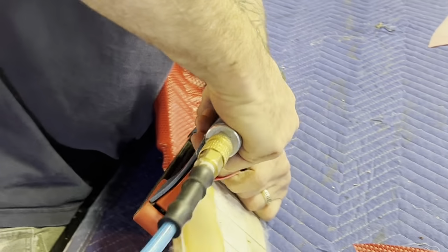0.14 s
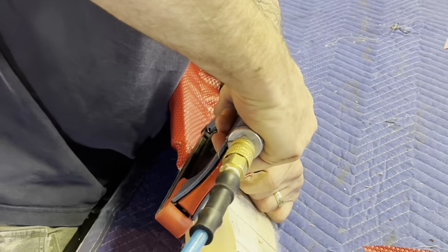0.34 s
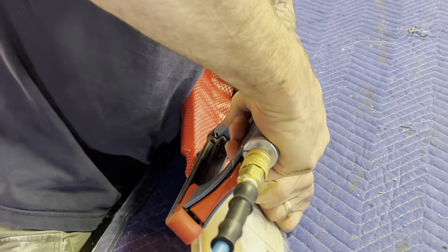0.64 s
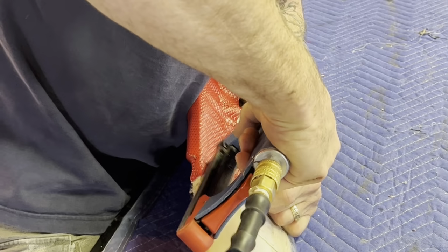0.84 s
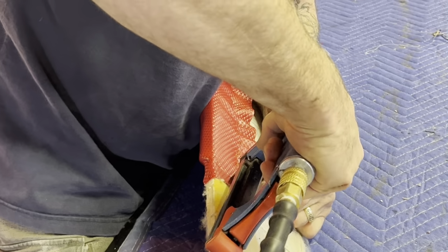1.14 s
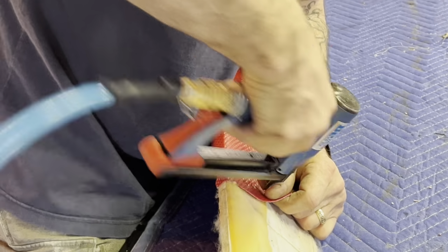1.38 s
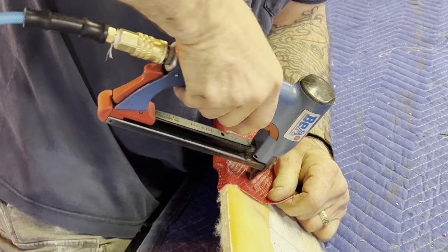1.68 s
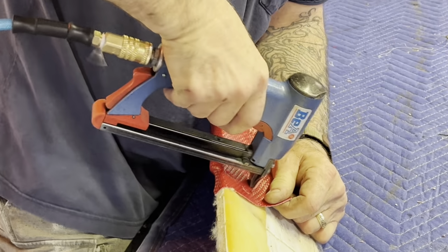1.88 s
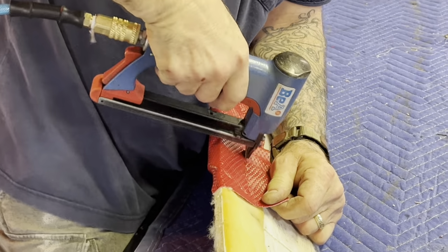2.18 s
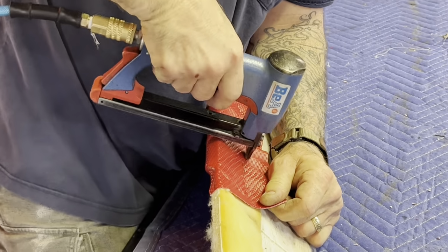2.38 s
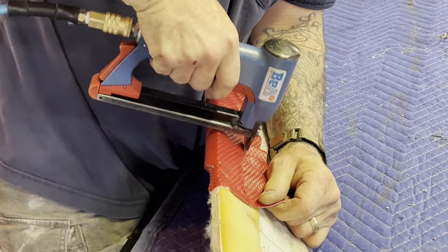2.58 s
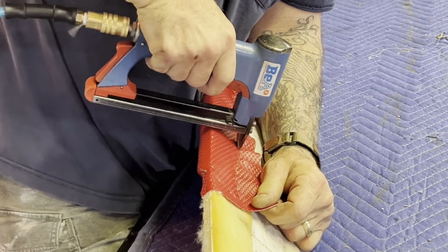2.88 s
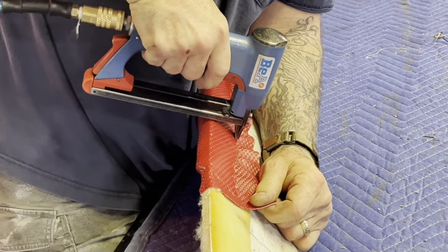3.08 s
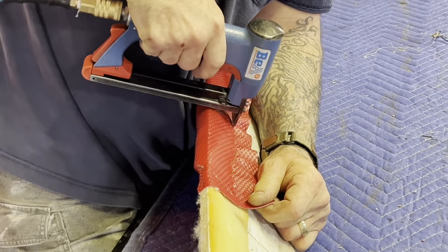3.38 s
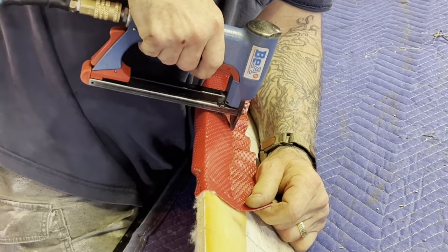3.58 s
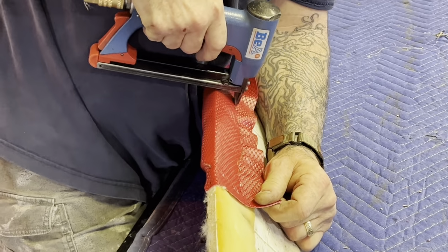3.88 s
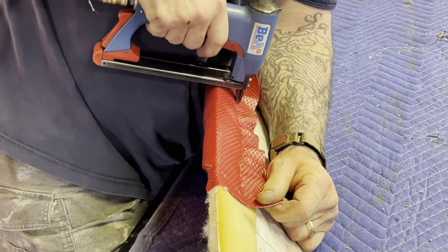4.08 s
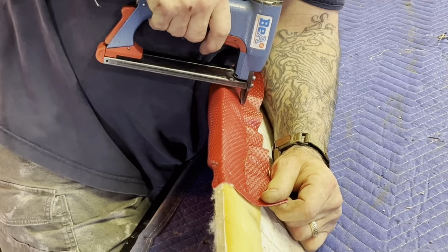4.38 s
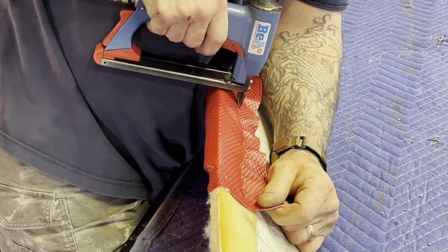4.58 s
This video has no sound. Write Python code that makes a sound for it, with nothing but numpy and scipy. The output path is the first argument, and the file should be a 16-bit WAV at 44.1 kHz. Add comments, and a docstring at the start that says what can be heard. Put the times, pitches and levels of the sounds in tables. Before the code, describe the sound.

Close, sharp cracks of a pneumatic staple gun hitting a wooden frame, eight times at an uneven pace, with clicking air puffs between.

```python
"""Air stapler in a workshop

Eight staples go through vinyl into a wooden frame, close by. At each pull of the trigger, air rushes in,
the blade meets the staple, the piston slams home and the frame rings in its modes. At each release, the
valve clicks, the exhaust puffs and the piston returns. The tool is held end-on for two staples, where
its inlet and nose are louder, then swung side-on. The room reverberates over a low rumble."""
import sys
import numpy as np
from scipy import signal
from scipy.fft import rfft, irfft, next_fast_len
from scipy.io import wavfile
from scipy.ndimage import uniform_filter1d

SR = 44100
rng = np.random.default_rng(int(sys.argv[2]) if len(sys.argv) > 2 else 0)


def to_wav(sig):
    """Store sig (one row per channel, or 1-D mono) as 16-bit WAV at the path in sys.argv[1].

    Samples outside -1..1 are clipped; the rate is SR.
    """
    pcm = np.clip(np.atleast_2d(sig), -1, 1) * 32767
    pcm = np.round(pcm).astype(np.int16)
    wavfile.write(sys.argv[1], SR, pcm.T)  # frames by channels


N = 209014
EVENT_S = np.arange(SR // 2) / SR  # time within one event

# The piston slams home: time_s, blow_db, tilt_db_per_octave, leak_db
STAPLE_SHOTS = [(0.7097, -15, -0.5, -40), (1.1246, -8, 0.5, -49.5), (1.8803, -9, 1.5, -45),
                (2.4383, -9, 0.4, -47), (2.838, -9, -1.34, -44.5), (3.1902, -9, -0.7, -45.5),
                (3.5539, -9, -0.5, -44.5), (4.551, -7.5, -1.5, -47.5)]
# Spectra of the inrushing air, the blade's contact and the piston's blow: frequency_hz, level_db
INLET_SPECTRUM = [(100, -30.5), (700, -16.5), (1700, -4), (2500, -1.5), (4000, -4), (5500, -1), (7500, 1.5),
                  (9000, -9), (13000, -11.5), (15500, -3.5)]
BLADE_SPECTRUM = [(80, -14.5), (300, -4), (700, -4), (1500, -1), (2200, -4.5), (3500, -14), (7000, -23.5),
                  (15500, -16.5)]
BLOW_SPECTRUM = [(60, -16.5), (220, 1.5), (450, -4.5), (700, -5.5), (1100, 0.5), (2800, -3), (4500, -6),
                 (7000, -7.5), (8500, -16), (12000, -11.5), (15500, -25)]
# Modes of the steel nose: pitch_hz, bandwidth_hz, level_db
NOSE_MODES = [(1130, 990, -4), (2650, 630, 0)]
# Pairs given to posed() are (side-on, end-on).
INLET_LEAD_S, INLET_DB, CLANG_DB = (0.016, 0.0098), (-21.5, -10), (-33, -7)
REBOUND_DELAY_S, REBOUND_DB = (0.0036, 0.0061), (-15.5, -8)
def piston_stroke(s, blow_db, tilt_db):
    """Impact: air drives the piston, the blade shears off a staple, steel collides and the tool rebounds."""
    rebound_s, rebound_db = s + posed(REBOUND_DELAY_S, s), posed(REBOUND_DB, s)
    inlet_s = s - posed(INLET_LEAD_S, s)
    steel = colour(BLOW_SPECTRUM)
    inlet = bursts(inlet_s, posed(INLET_DB, s), colour(INLET_SPECTRUM), rise_s=0.0079, t60_s=0.025)
    blade = bursts(s - 0.0048, blow_db - 9.5, colour(BLADE_SPECTRUM), rise_s=0.001, t60_s=0.04, alike=0.1)
    blow = bursts(s - 0.0008, blow_db + 0.5, steel,
                  rise_s=0.00075, t60_s=0.015, alike=0.59, tilt_db=tilt_db)
    rebound = bursts(rebound_s - 0.0005, rebound_db - 8.5, steel,
                     rise_s=0.00044, t60_s=0.011, alike=0.13, tilt_db=tilt_db)
    crack = cracks(s + 0.00016, blow_db + 6.5) + cracks(rebound_s, rebound_db + 3.5)
    clang = bursts(s - 0.0005, posed(CLANG_DB, s), resonances(NOSE_MODES), rise_s=0.0005, t60_s=0.025)
    return inlet + blade + blow + rebound + crack + clang


# Modes of the wooden frame: pitch_hz, level_db, t60_s
FRAME_MODES = [(130.7, -7.5, 0.29), (294, -10, 0.5), (380, -2.5, 0.13), (441, -3, 0.17), (522, -5.5, 0.072),
               (608.6, -5.5, 0.33), (1095, -1, 0.1), (1224, -17, 0.043), (1378, -3, .15), (1763, 2.5, 0.3),
               (1836, 7.5, 0.19), (2270, -6.5, .13), (2590, -7, 0.28), (2850, -13.5, .13)]
def frame_ring(scatter_db):
    """Free vibration: each mode is a damped sinusoid, excited a little differently by every blow."""
    hz, db, t60_s = np.transpose(FRAME_MODES)[:, :, None]
    decay = amp(db + scatter_db * rng.standard_normal(db.shape) - 60 * EVENT_S / t60_s)
    onset = 1 - np.exp(-EVENT_S / 0.006)
    return np.sum(decay * np.sin(2 * np.pi * hz * EVENT_S), axis=0) * onset


# Spectrum of the rattling wood: frequency_hz, level_db
WOOD_SPECTRUM = [(60, -15), (130, 6), (260, -4.5), (450, -3.5), (750, -3), (1200, 0), (2000, 0), (4500, -5),
                 (7000, -14.5), (10000, -25.5), (15500, -28.5)]
FRAME_DB, RATTLE_DELAY_S, BENCH_DB = -25.5, (0.003, 0.0098), (-39, -36)
def wooden_frame(s, blow_db, tilt_db):
    """Impulsive excitation: the blow pushes the frame, which thuds, rattles, rings and jolts the bench."""
    frame_db = np.full(len(s), FRAME_DB)
    push = thumps(s - 0.0005, blow_db - 13, pitch_hz=386, fall_s=0.033, peak_s=0.0026, width_s=0.0013)
    thud = thumps(s + 0.018, frame_db - 4.5, pitch_hz=140, fall_s=0.16, peak_s=0.002, width_s=0.0076)
    rattle = bursts(s + posed(RATTLE_DELAY_S, s), frame_db + 4, colour(WOOD_SPECTRUM),
                    rise_s=0.0025, t60_s=0.17, alike=0.27, tilt_db=tilt_db)
    ring = placed(s, [amp(db - 7.5) * frame_ring(scatter_db=1.5) for db in frame_db])
    return push + thud + rattle + ring + bench(s + 0.0061, posed(BENCH_DB, s))


def bench(s, level_db):
    """Heavy damping: the padded bench gives one dull boom under each jolt."""
    return thumps(s + 0.014, level_db, pitch_hz=67.5, fall_s=0.14, peak_s=0.0025, width_s=0.015)


# The exhaust opens: time_s, jet_db, bench_db
TRIGGER_RELEASES = [(0.8823, -9.5, -24), (1.2512, -11, -31.5), (2.0138, -11.5, -38.5), (2.5679, -11.5, -39),
                    (2.9665, -10.5, -36.5), (3.2952, -11, -38.5), (3.668, -11.5, -38), (4.7168, -11.5, -40)]
# Spectra of the valve's click and the exhaust jet: frequency_hz, level_db
VALVE_SPECTRUM = [(100, -17), (280, -2.5), (520, -1), (900, -13.5), (1700, -2), (2700, -7), (4000, -11.5),
                  (8000, -25.5), (15500, -24)]
JET_SPECTRUM = [(100, -21.5), (450, -9), (700, -7.5), (1000, 1.5), (1400, -9.5), (2200, 0), (3600, 0.5),
                (4800, -1.5), (7000, -1), (8500, -6), (11000, -4), (13000, -3.5), (15500, -4.5)]
# Modes of the steel housing: pitch_hz, bandwidth_hz, level_db
HOUSING_MODES = [(1210, 40, -15), (1860, 73, 7), (1930, 150, -4.5), (2760, 45, -21), (3360, 38, -11.5),
                 (3420, 64, -12), (4710, 17, -23), (5380, 36, -4.5), (7360, 120, -20.5)]
RETURN_DELAY_S, RETURN_DB = 0.015, (-19, -27)
def exhaust():
    """Sudden decompression: the valve clicks, air leaves in a jet and a puff, the piston knocks back."""
    s, jet_db, bench_db = np.transpose(TRIGGER_RELEASES)
    return_s, return_db = s + RETURN_DELAY_S, posed(RETURN_DB, s)
    click = colour(VALVE_SPECTRUM)
    valve = bursts(s - 0.008, jet_db - 4.4, click, rise_s=0.0004, t60_s=0.022, alike=0.3)
    jet = bursts(s - 0.0052, jet_db, colour(JET_SPECTRUM), rise_s=0.0024, t60_s=0.096)
    puff = thumps(s, jet_db - 3.9, pitch_hz=204.2, fall_s=0.015, peak_s=0.0023, width_s=0.0032)
    stop = thumps(s + 0.0203, jet_db - 11.4, pitch_hz=206, fall_s=0.045, peak_s=0.0024, width_s=0.0017)
    clack = bursts(return_s, return_db - 2, click, rise_s=0.0019, t60_s=0.049, alike=0.1)
    ring = bursts(return_s, return_db - 0.5, resonances(HOUSING_MODES),
                  rise_s=0.0054, t60_s=0.08, alike=0.049)
    return valve + jet + puff + stop + clack + ring + bench(s + 0.0039, bench_db)


# Whistle bands of the air round the driver: pitch_hz, bandwidth_hz, level_db
RASP_BANDS = [(3000, 700, -6.5), (4190, 1200, -0.5)]
RASP_DB = (-44.5, -31.5)
def driver_rasp(s):
    """Flow through a narrow gap: air squeezes out round the driver after each blow."""
    whistle = lambda hz: resonances(RASP_BANDS)(hz) ** 2
    return bursts(s + 0.018, posed(RASP_DB, s), whistle, rise_s=0.005, t60_s=0.26)


# Spectrum of the leaking air: frequency_hz, level_db
LEAK_SPECTRUM = [(200, -23.5), (1500, 3), (4500, 1), (7000, -1.5), (9000, -6), (15500, -4)]
def seal_leak(s, leak_db):
    """Turbulence: air hisses past the seals while the trigger is held, more as the finger eases off."""
    held_s = np.transpose(TRIGGER_RELEASES)[0] - s
    swells = [amp(db + np.linspace(-2.5, 1.5, round(hold * SR))) for db, hold in zip(leak_db, held_s)]
    return uniform_filter1d(placed(s, swells), size=200) * noise(colour(LEAK_SPECTRUM), N)


# The nose is set down, the trigger takes up slack: time_s, tick_db, knock_db
HANDLING_TAPS = [(.028, -36, -52), (.571, -49, -66), (.603, -52.5, -77.5), (2.13, -47.5, -39.5),
                 (4.286, -61, -60.5), (4.421, -68, -68.5)]
# Spectra of those contacts: frequency_hz, level_db
TICK_SPECTRUM = [(300, -5.5), (1400, -4.5), (2200, -3), (6000, -1), (9000, -10.5), (15500, -18)]
KNOCK_SPECTRUM = [(80, -1), (350, 4), (700, -12.5), (1300, -2.5), (2500, -17.5), (8000, -38.5)]
# The tool bumps the padded frame: time_s, level_db
SOFT_BUMPS = [(.026, -27.5), (0.086, -37)]
# Faint thin whistles: start_s, pitch_hz, level_db
WHISTLES = [(0.589, 2690, -57.5), (1.442, 1724, -61.5), (4.39, 3210, -73)]
def handling(swell_s=0.026):
    """Contact noise: the tool ticks and bumps along the seam, while faint whistles swell and fade."""
    s, tick_db, knock_db = np.transpose(HANDLING_TAPS)
    ticks = bursts(s, tick_db, colour(TICK_SPECTRUM), rise_s=0.001, t60_s=0.015)
    knocks = bursts(s, knock_db, colour(KNOCK_SPECTRUM), rise_s=0.0057, t60_s=0.14)
    bumps = thumps(*np.transpose(SOFT_BUMPS), pitch_hz=102, fall_s=0.039, peak_s=0.0035, width_s=0.0035)
    swell = EVENT_S / swell_s * np.exp(1 - EVENT_S / swell_s)
    tones = [amp(db) * swell * np.sin(2 * np.pi * hz * EVENT_S) for _, hz, db in WHISTLES]
    return ticks + knocks + bumps + placed(np.transpose(WHISTLES)[0], tones)


# The tool swings round after the second staple: time_s, end_on_fraction
TOOL_POSE = [(1.25, 0.87), (1.5, 0.29), (2.4, 0.016)]
def posed(pair, s):
    """Directivity: a (side-on, end-on) pair is blended by how the tool is held at the times s."""
    side_on, end_on = pair
    return side_on + (end_on - side_on) * curve(TOOL_POSE, s)


def early_reflections(x, t60_s=0.0083):
    """Scattering: short paths off the bench, arms and body change as the worker moves."""
    step = SR // 8
    t = EVENT_S[:SR // 20]
    starts = np.arange(0, N, step)
    paths = rng.standard_normal((len(starts), len(t))) * amp(-60 * t / t60_s)
    echoes = [signal.fftconvolve(x[i:i + step], p / np.linalg.norm(p)) for i, p in zip(starts, paths)]
    return placed(starts / SR, echoes)


# Reverberation time of the room: frequency_hz, t60_s
ROOM_DECAY = [(100, 0.44), (400, 0.26), (2000, 0.3), (5000, 0.36), (8000, 0.32), (15000, 0.23)]
# Spectrum of the reverberation: frequency_hz, gain_db
ROOM_SPECTRUM = [(70, -15.5), (110, -3), (200, -6), (600, -0.5), (2000, -3.5), (4500, -5.5), (8000, -8.5),
                 (15000, -11)]
def room(x, build_s=0.014):
    """Reverberation: wall echoes build up and decay; each stretch of sound meets its own random tail."""
    out = np.zeros(N + SR)
    step = SR // 4
    for start in range(0, N, step):
        hz, t, spectra = signal.stft(rng.standard_normal(SR // 2), SR, nperseg=256)
        decay = amp(-60 * t / along(ROOM_DECAY, hz)[:, None])
        _, tail = signal.istft(spectra * decay, SR, nperseg=256)
        tail *= np.clip(np.arange(len(tail)) / SR / build_s, 0, 1) ** 2
        wet = signal.fftconvolve(x[start:start + step], tail / np.linalg.norm(tail))
        out[start:start + len(wet)] += wet
    return filtered(out[:N], colour(ROOM_SPECTRUM))


# The background noise grows quieter after the first two staples: time_s, level_db
BACKGROUND_LEVELS = [(0, -61.5), (1.2, -58.5), (1.8, -62.5), (2.3, -70), (4.74, -70.5)]
# A motor's hum swells late: time_s, level_db
HUM_LEVELS = [(3.8, -67.5), (4.3, -59), (4.74, -63)]
# Spectra of the rumble, the broadband noise and the steady room tone: frequency_hz, level_db
RUMBLE_SPECTRUM = [(20, -19), (40, -14.5), (60, 12.5), (80, -1), (120, 2.5), (140, -1.5), (170, -20),
                   (300, -26), (660, -67)]
BROADBAND_SPECTRUM = [(90, -23.5), (180, -7), (330, -8.5), (550, -8.5), (1000, -8.5), (1300, -11.5),
                      (1750, -7.5), (2450, -20.5), (5000, -25), (8000, -30), (11000, -41.5), (15000, -42.5)]
ROOM_TONE_SPECTRUM = [(100, -11.5), (220, -3.5), (380, 0.5), (600, -5), (1000, -13), (1800, -11),
                      (3000, -23), (12000, -45)]
def workshop():
    """Ambient noise: rumble, broadband noise and a thin whine grow quieter together over hum and room tone."""
    t = np.arange(N) / SR
    background_db = curve(BACKGROUND_LEVELS, t)
    change_db = background_db - background_db.mean()
    rumble = amp(-57.5 + 0.91 * change_db) * noise(colour(RUMBLE_SPECTRUM), N)
    broadband = amp(background_db) * noise(colour(BROADBAND_SPECTRUM), N)
    hum = amp(curve(HUM_LEVELS, t)) * narrowband(pitch_hz=92.5, width_hz=3)
    whine = amp(-77 + 1.6 * change_db) * narrowband(pitch_hz=1022, width_hz=6)
    room_tone = amp(-77) * noise(colour(ROOM_TONE_SPECTRUM), N)
    return rumble + broadband + hum + whine + room_tone


def bursts(times, level_db, response, rise_s, t60_s, alike=0, tilt_db=0):
    """Transient noise: bursts swell and decay; the share alike repeats, as when the same parts collide."""
    repeated = np.sqrt(alike) * rng.standard_normal(len(EVENT_S))
    fresh = np.sqrt(1 - alike) * rng.standard_normal((len(times), len(EVENT_S)))
    tilt = lambda hz: amp(np.reshape(tilt_db, (-1, 1)) * np.log2((hz + 200) / 2500))
    grain = unit(filtered(repeated + fresh, lambda hz: response(hz) * tilt(hz)))
    attack = np.minimum(EVENT_S / rise_s, 1) ** 2
    decay = amp(-60 * np.maximum(EVENT_S - rise_s, 0) / t60_s)
    return placed(times, amp(level_db)[:, None] * grain * attack * decay)


def thumps(times, level_db, pitch_hz, fall_s, peak_s, width_s):
    """Wave packets: a few low swings crest at each time, their pitch sinking by a factor e in fall_s."""
    lead_s = 0.02
    t = EVENT_S - lead_s
    swing = np.cos(2 * np.pi * pitch_hz * fall_s * (1 - np.exp(-t / fall_s)))
    pulse = swing / np.cosh(np.clip((t - peak_s) / width_s, -20, 20))
    return placed(times - lead_s, amp(level_db)[:, None] * pulse)


def cracks(times, level_db, width_s=0.00007):
    """Hard contact: steel on steel radiates one sharp swing of pressure."""
    u = EVENT_S / width_s
    return placed(times, -amp(level_db)[:, None] * (1 - u) * np.exp(-u))


def resonances(modes):
    """Modal response: (pitch_hz, bandwidth_hz, level_db) resonators summed with alternating signs."""
    return lambda hz: sum((-1) ** k * amp(db) * 1j * hz * width / (pitch**2 - hz**2 + 1j * hz * width)
                          for k, (pitch, width, db) in enumerate(modes))


def narrowband(pitch_hz, width_hz):
    """Sharp resonance: noise confined to a narrow band is heard as a wavering tone."""
    return noise(lambda hz: resonances([(pitch_hz, width_hz, 0)])(hz) ** 2, N)


def noise(response, shape):
    """Spectral shaping: coloured noise of rms 1."""
    return unit(filtered(rng.standard_normal(shape), response))


def filtered(x, response):
    """Linear filtering: the spectrum of x times a frequency response."""
    n = x.shape[-1]
    padded = next_fast_len(n + SR // 4)
    return irfft(rfft(x, padded) * response(np.fft.rfftfreq(padded, 1 / SR)), padded)[..., :n]


def placed(times, sounds):
    """Superposition: one sound is added at each time."""
    out = np.zeros(N + SR)
    for s, sound in zip(times, sounds):
        out[max(round(s * SR), 0):][:len(sound)] += sound
    return out[:N]


def colour(points):
    """The frequency response of a (frequency_hz, level_db) spectrum."""
    return lambda hz: amp(along(points, hz))


def along(points, hz):
    """Interpolation of (frequency_hz, value) points on a log axis."""
    frequencies, values = np.transpose(points)
    return np.interp(np.log(hz + 1), np.log(frequencies), values)


def curve(points, s):
    """Interpolation of (time_s, value) points."""
    return np.interp(s, *np.transpose(points))


def amp(db):
    """Decibels to amplitude ratio."""
    return 10 ** (np.asarray(db) / 20)


def unit(x):
    """Normalisation to rms 1."""
    return x / np.sqrt(np.mean(x ** 2) + 1e-20)


# Side sound against front sound at the microphone: frequency_hz, ratio_db
SIDE_RATIO = [(140, -23), (500, -7), (1100, -1), (1500, 1.5), (1900, -6), (4500, -28.5), (5700, -4),
              (7000, -18), (8500, -33), (15000, -15.5)]
def ports(front, sides, spread_db):
    """Mid-side stereo: two microphone ports share front sound and take side sound with opposite signs."""
    spread = lambda hz: amp(along(SIDE_RATIO, hz) + spread_db)
    mid = filtered(front, lambda hz: 1 / np.hypot(1, spread(hz)))
    side = filtered(sides, lambda hz: spread(hz) / np.hypot(1, spread(hz)))
    return np.array([mid + side, mid - side])


def scene():
    """Direct and diffuse fields: the stapler close by, its reverberation and the workshop behind."""
    s, blow_db, tilt_db, leak_db = np.transpose(STAPLE_SHOTS)
    shots = piston_stroke(s, blow_db, tilt_db) + driver_rasp(s) + wooden_frame(s, blow_db, tilt_db)
    tool = shots + exhaust() + seal_leak(s, leak_db) + handling()
    front, sides = [amp(-12.5) * room(tool) + workshop() for _ in range(2)]
    return ports(tool, early_reflections(tool), spread_db=-5.5) + ports(front, sides, spread_db=0)


# Phase between the two microphone ports: frequency_hz, left_lead_rad
PORT_LEAD = [(100, 0), (1900, 0), (2900, .4), (4000, .05), (7200, -.2), (8700, -1.6), (9900, -3.14),
             (11300, -4.5), (12800, -6.28), (14300, -7.7), (15800, -9.4)]
PEAK_LIMIT, TOP_HZ = 0.88, 15950
def record(dry):
    """Transduction: the ports part in phase in the treble, peaks saturate and the band is limited."""
    phase_shift = lambda hz: np.exp(0.5j * np.outer([1, -1], along(PORT_LEAD, hz)))
    shifted = filtered(dry, phase_shift)
    rounded = shifted / (1 + np.abs(shifted / PEAK_LIMIT) ** 6) ** (1 / 6)
    return filtered(rounded, lambda hz: 1 / np.sqrt(1 + (hz / TOP_HZ) ** 260))


dry = scene()
out = record(dry)
to_wav(out)
```